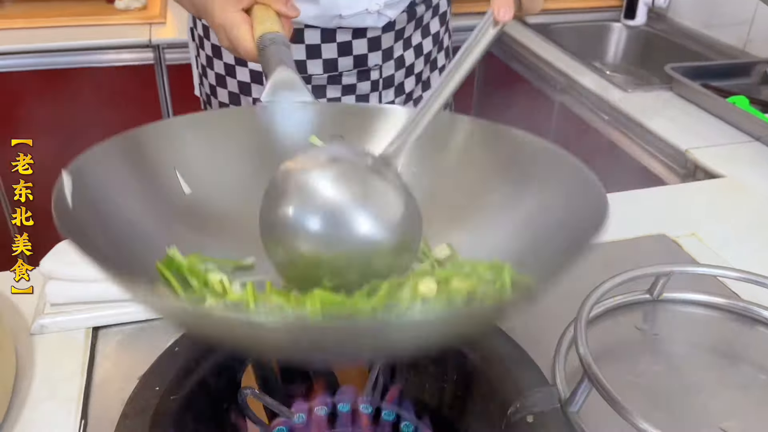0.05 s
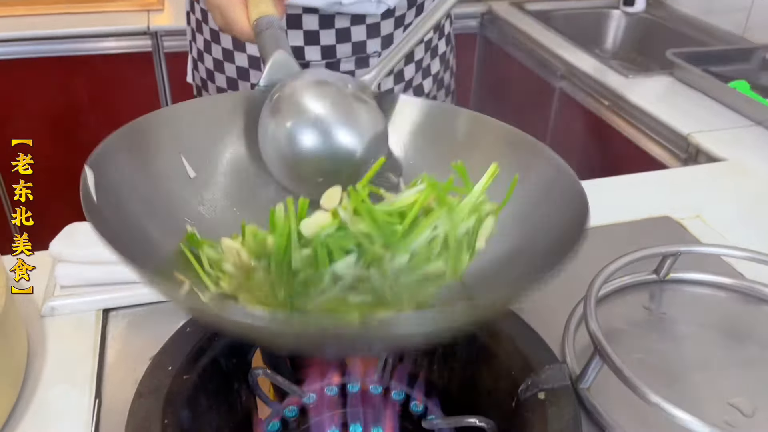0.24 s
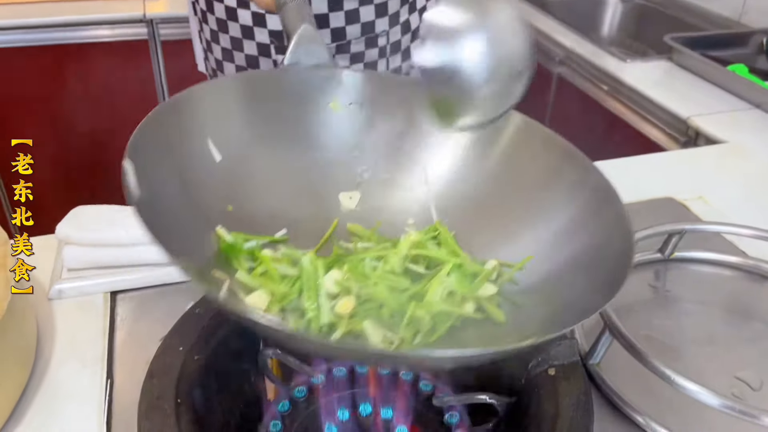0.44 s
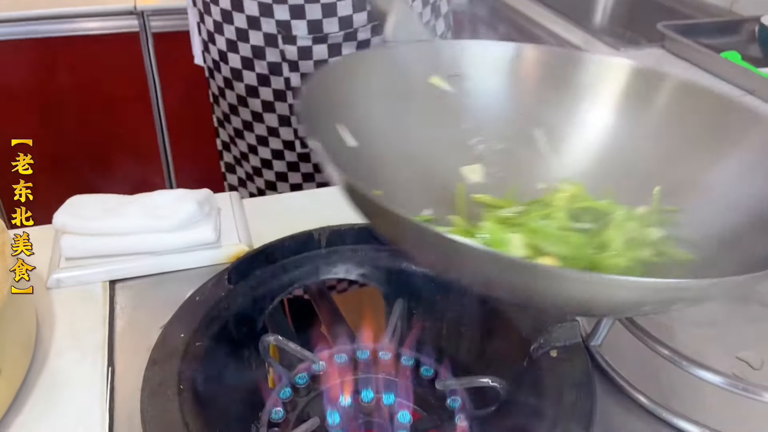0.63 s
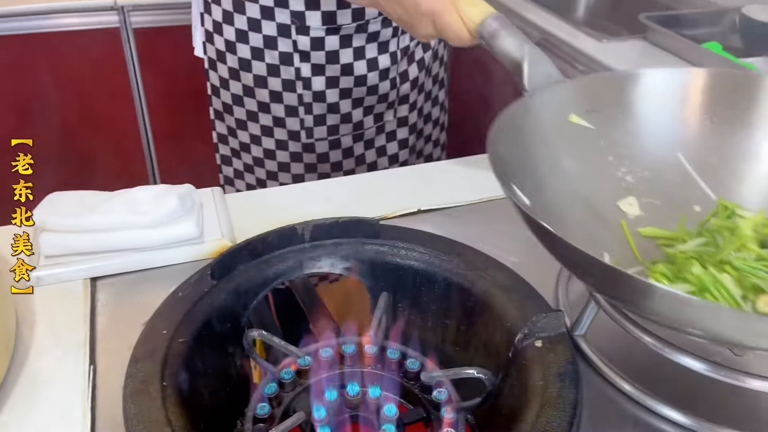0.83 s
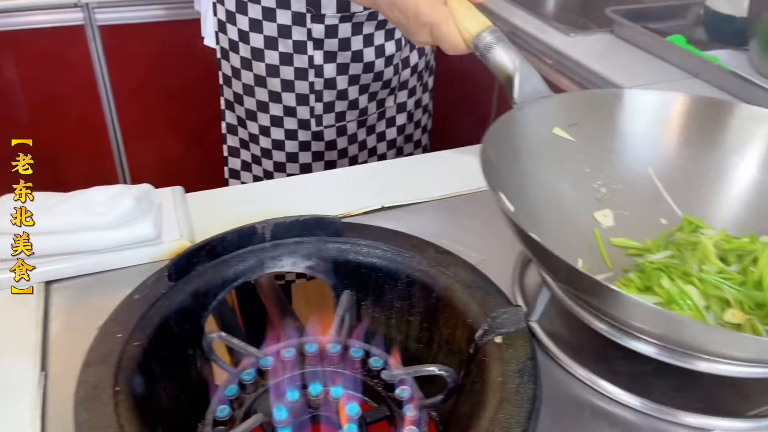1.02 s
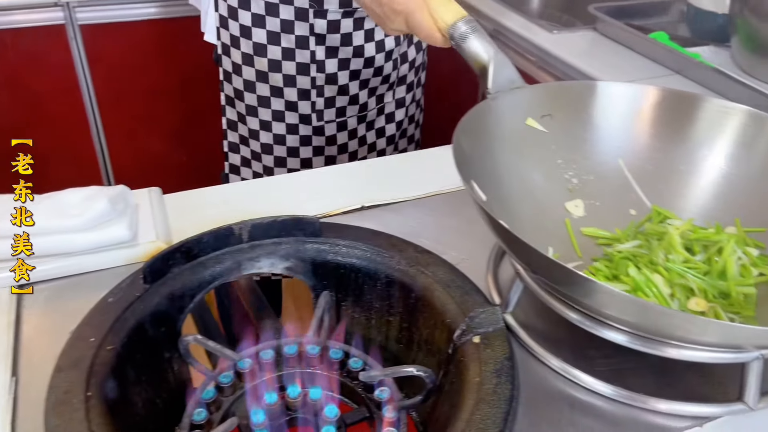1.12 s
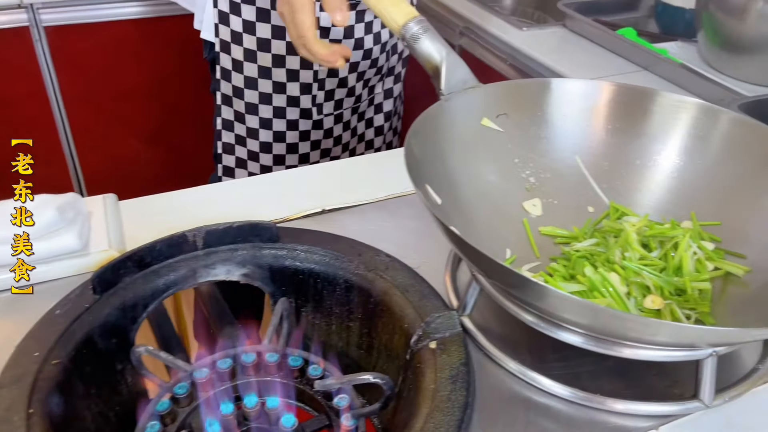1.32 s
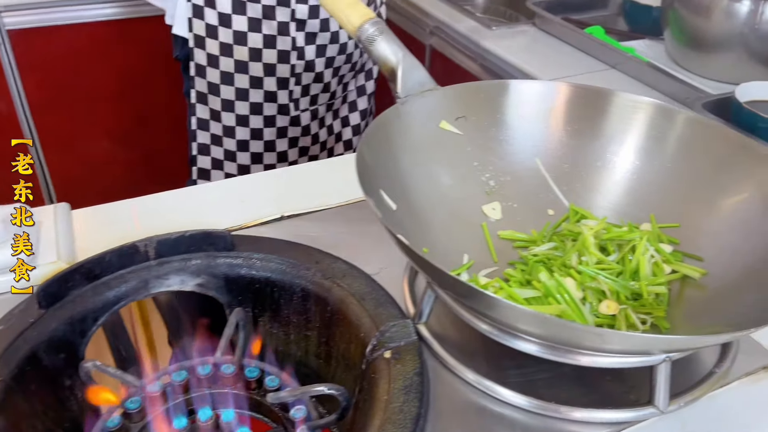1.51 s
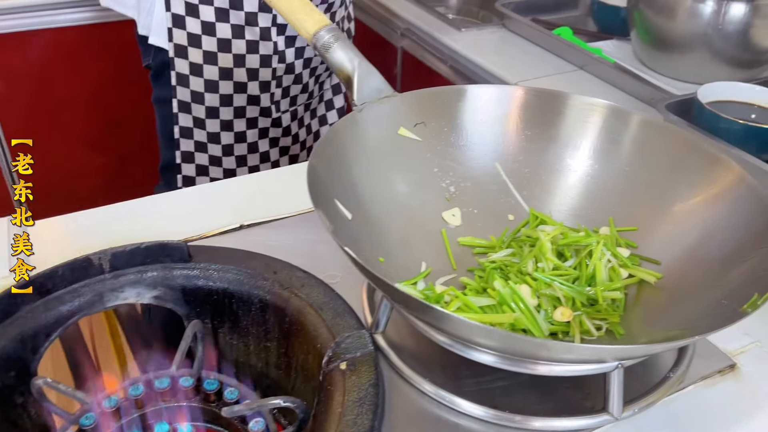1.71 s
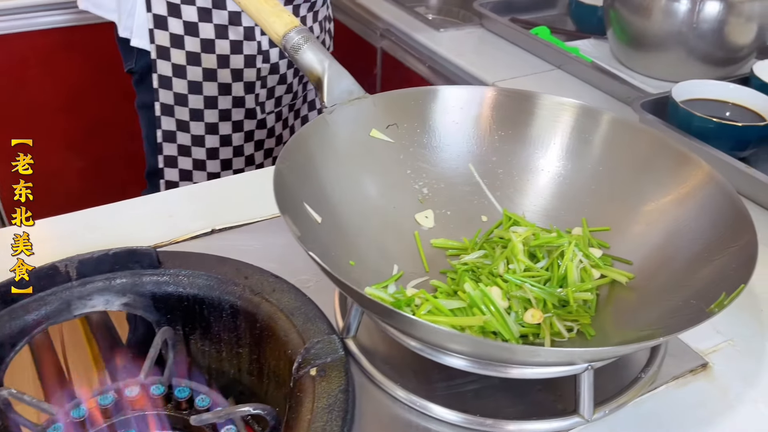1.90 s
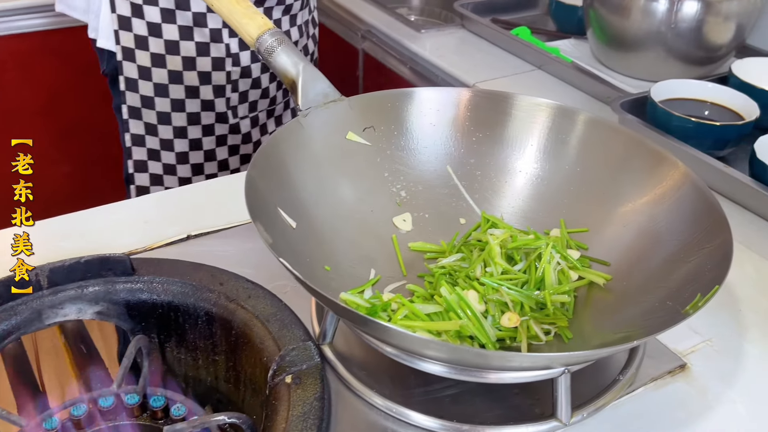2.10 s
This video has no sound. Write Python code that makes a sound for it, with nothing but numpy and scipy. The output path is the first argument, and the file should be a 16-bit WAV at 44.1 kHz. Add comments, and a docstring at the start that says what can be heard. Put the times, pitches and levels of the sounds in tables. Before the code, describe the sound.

Vegetables sizzle in a wok over a gas burner, with a ladle clank and a clatter.

```python
"""Stir-frying in a wok

Greens sizzle in a steel wok over a roaring gas burner in a hard-walled kitchen. Turbulence
makes the roar, bursting steam bubbles the sizzle. A ladle scrapes under the food and strikes
the wok, exciting its normal modes. The wok is then set down on a ring stand; its rocking
drives the resonances of the hollow steel counter, and the sizzle settles, spitting oil."""
import sys
import numpy as np
from scipy import signal
from scipy.fft import rfft, irfft
from scipy.io import wavfile
from scipy.ndimage import uniform_filter1d

SR = 44100
rng = np.random.default_rng(int(sys.argv[2]) if len(sys.argv) > 2 else 0)


def generate_wav(sig):
    """Save sig (samples, or channels by samples) to the path in sys.argv[1] as 16-bit PCM at SR."""
    pcm = np.round(np.clip(np.atleast_2d(sig).T, -1, 1) * 32767).astype(np.int16)
    wavfile.write(sys.argv[1], SR, pcm)


N = 94815
TIME = np.arange(N) / SR
BIN_HZ = np.fft.rfftfreq(N, 1 / SR)

# Likeness of left and right in the room: frequency_hz, correlation (-1 to 1)
COHERENCE = [(60, 1), (200, 0.94), (370, 0.96), (680, 0.47), (1240, 0.38), (1550, -0.2), (1850, .9),
             (2300, 0.68), (3300, 0.37), (5400, 0.26), (7400, -0.42), (9300, -0.62), (10300, 1),
             (14000, 0.76)]


def amp(db):
    """Amplitude ratio of a level in decibels."""
    return 10 ** (np.asarray(db) / 20)


def unit(x):
    """Normalisation to an rms of 1."""
    return x / np.sqrt(np.mean(x ** 2) + 1e-20)


def at_hz(points, hz):
    """Interpolation of a table on a logarithmic frequency axis."""
    frequencies, values = np.transpose(points)
    return np.interp(np.log(hz + 1), np.log(frequencies + 1), values)


def at_time(rows, t, column=1):
    """Linear interpolation of one table column over time."""
    rows = np.array(rows)
    return np.interp(t, rows[:, 0], rows[:, column])


def add(mix, start_s, sound):
    """Superposition: a sound joins the mix at its onset."""
    part = mix[:, round(start_s * SR):]
    part += sound[..., :part.shape[1]]


def colour(x, spectrum):
    """Spectral shaping: two independent signals, weighted as mid and side, take on the room's coherence."""
    correlation = np.clip(at_hz(COHERENCE, BIN_HZ), -1, 1)
    mid, side = rfft(x) * amp(at_hz(spectrum, BIN_HZ)) * np.sqrt([1 + correlation, 1 - correlation])
    return unit(irfft(np.array([mid + side, mid - side]), N))


def noise(spectrum):
    """Filtered Gaussian noise in stereo; the spectrum sets its shape, and its rms is 1."""
    return colour(rng.standard_normal((2, N)), spectrum)


def churn(x, patch_db, flicker_db, size):
    """Random amplitude modulation, in time-frequency patches and across all bands at once."""
    z = signal.stft(x, nperseg=size)[2]
    patches = uniform_filter1d(rng.standard_normal(z.shape[1:]), size=6, axis=0)
    patches = unit(uniform_filter1d(patches, size=8, axis=1))
    flicker = unit(uniform_filter1d(rng.standard_normal(z.shape[2]), size=2))
    gain = amp(patch_db * patches + flicker_db * flicker)
    return unit(signal.istft(z * gain, nperseg=size)[1][:, :N])


def burner():
    """Turbulent combustion radiates a low, fluttering roar, now duller, now more throaty."""
    # Flame noise: frequency_hz, density_db
    spectrum = [(20, -28), (32, -22), (46, -0.5), (65, -9), (92, 0.5), (150, -1), (230, -3.5), (400, -6.5),
                (660, -9), (850, -17.5), (1200, -21.5), (1520, -8.5), (1750, -65), (4000, -40.5)]
    # Course of the roar: time_s, level_db, throat_lift_db
    envelope = [(0, -42.5, 0.5), (.1, -45.5, -0.5), (.24, -42, 0.5), (.36, -52, 1), (.5, -44.5, -1.5),
                (.7, -45.5, 2), (.85, -44.5, -0.5), (1.28, -42.5, -1.5), (1.45, -43.5, 0.5),
                (1.58, -44.5, 2.5), (1.7, -44, 3), (1.9, -44, 0.5), (2.15, -43.5, -1.5)]
    throat_hz = 620
    roar = churn(noise(spectrum), patch_db=0, flicker_db=0.82, size=1024)
    hz, t, z = signal.stft(roar, SR, nperseg=512)
    throat = np.exp(-np.log2((hz + 1) / throat_hz) ** 2)[:, None]
    gain = amp(at_time(envelope, t) + throat * at_time(envelope, t, column=2))
    return signal.istft(z * gain, nperseg=512)[1][:, :N]


def frying():
    """Shot noise of bursting steam bubbles over a hiss, louder and brighter as the food is turned."""
    # Bubbles and hiss: frequency_hz, density_db
    spectrum = [(300, -40), (900, -6.5), (1500, -2.5), (1750, -4.5), (2300, -0.5), (3200, 1.5), (3900, 0.5),
                (4550, 1.5), (5200, -5), (6500, -2.5), (8000, -6.5), (10500, -11.5), (14000, -21)]
    # Course of the sizzle: time_s, level_db, treble_tilt_db_per_octave
    envelope = [(0, -35, 1.9), (.1, -37.5, 1.5), (.15, -39.5, -0.84), (.21, -40.5, 3.4), (.3, -48.5, -0.15),
                (.41, -44.5, 1.2), (.45, -39.5, 0.77), (.52, -40.5, 3.2), (.63, -40.5, -3), (.7, -40.5, -1),
                (.78, -44.5, 1.1), (.88, -41, -1.6), (1.0, -43, -0.8), (1.14, -45.5, -3.6),
                (1.3, -44, -0.66), (1.72, -45, 0.23), (1.85, -45, 0.15), (2.15, -44.5, -1.3)]
    # Louder spits of oil: start_s, level_db, tail_time_constant_s
    spits = [(0.831, -38, .005), (1.285, -32.5, 0.014), (1.476, -32.5, .014), (1.533, -38.5, .005),
             (1.797, -32, .004), (1.926, -41, .005), (2.021, -34.5, .004)]
    # Noise of one spit: frequency_hz, density_db
    spit_spectrum = [(300, -10), (1450, 6.5), (2500, 9), (4500, 0), (6500, -9), (14000, -14)]
    bubbles_per_s, spread_db, tilt_hz, spit_s = 1800, 4, 4000, 0.0007
    sizes = amp(spread_db * np.minimum(rng.exponential(1, N), 5)) * rng.choice([-1, 1], N)
    bursts = sizes * (rng.random(N) < bubbles_per_s / SR)
    angle = rng.uniform(0, 2 * np.pi, N)
    bubbles = colour(bursts * np.array([np.cos(angle), np.sin(angle)]), spectrum)
    hiss = churn(noise(spectrum), patch_db=1.2, flicker_db=1, size=256)
    hz, t, z = signal.stft(bowl_echo(amp(-4.5) * bubbles + amp(-2) * hiss), SR, nperseg=256)
    octaves = np.log2(np.maximum(hz / tilt_hz, 1))[:, None]
    gain = amp(at_time(envelope, t) + octaves * at_time(envelope, t, column=2))
    out = signal.istft(z * gain, nperseg=256)[1][:, :N]
    for start_s, level_db, tail_s in spits:
        decay = np.exp(-TIME / spit_s) + amp(-12.5) * np.exp(-TIME / tail_s)
        add(out, start_s, amp(level_db) * decay * noise(spit_spectrum))
    return out


def bowl_echo(x, decay_s=0.0039):
    """Interference with quick reflections in the bowl gives the spectrum a metallic ripple."""
    t = TIME[:SR // 20]
    response = rng.standard_normal(len(t)) * np.exp(-t / decay_s) * np.minimum(t / decay_s, 1)
    echoes = signal.fftconvolve(x, response[None] / np.linalg.norm(response), axes=1)[:, :N]
    return unit(x + amp(-6.5) * echoes)


def steam_surges(x, depth_db=1, centre_hz=3370):
    """Steam escaping in small surges modulates the amplitude of the sizzle's middle band."""
    hz, t, z = signal.stft(x, SR, nperseg=256)
    surge = unit(uniform_filter1d(uniform_filter1d(rng.standard_normal(len(t)), size=12), size=8))
    band = np.exp(-2 * np.log2((hz + 1) / centre_hz) ** 2)[:, None]
    return signal.istft(z * amp(depth_db * band * surge), nperseg=256)[1][:, :N]


def scrape():
    """Sliding friction of ladle and greens on steel makes an uneven midrange noise."""
    # Friction noise: frequency_hz, density_db
    spectrum = [(100, -22), (400, -7), (900, 7.5), (1500, 6.5), (2500, 0), (6000, -36)]
    # Strokes of the ladle: time_s, level_db
    strokes = [(0, -45), (.1, -47), (.16, -77), (.21, -42), (.26, -33.5), (.42, -67), (.47, -48), (.6, -64),
               (.75, -62)]
    return amp(at_time(strokes, TIME)) * churn(noise(spectrum), patch_db=1, flicker_db=4.5, size=256)


def ladle_clank():
    """Impact excitation: the ladle ticks, knocks and rebounds, and the wok rings in free vibration."""
    # Contact noise: frequency_hz, density_db
    tick_spectrum = [(500, 16), (2500, 3), (5000, -10), (7000, -7), (13000, -6)]
    # Heavily damped resonances of the blow: pitch_hz, level_db, peak_time_s, left_minus_right_db
    knock_modes = [(764, -8.5, 0.00113, -7.5), (1138, -5.5, 0.001393, 4), (1690, -15.5, 0.00114, 1),
                   (2170, -17.5, 0.00126, -4), (2910, -21, 0.00104, 6), (4500, -25, 0.00135, -1)]
    # What the room returns of the knock: frequency_hz, gain_db
    echo_filter = [(300, -13.5), (1250, 1.5), (1600, -8), (3300, -8), (4000, 7)]
    # Normal modes of the wok: pitch_hz, level_db, t60_s
    wok_modes = [(447, -19.5, 0.12), (548.5, -32, 0.37), (705, -45, 0.2), (973, -24, 0.25),
                 (994, -32.5, 0.45), (1156, -32, 0.13), (1185, -28.5, 0.41), (1258, -29.5, .35),
                 (1435, -30, .28), (2232, -27, 0.24), (2970, -36, 0.16), (3608, -32, .28), (4030, -34, .25),
                 (4006, -40, 0.4), (4440, -37, 0.27), (4705, -34, 0.37), (4810, -37, 0.37),
                 (5600, -40, 0.38), (6070, -43, 0.4)]
    # Dense shimmer of the bowl: frequency_hz, density_db
    shimmer_spectrum = [(25, -35), (60, -31), (200, 2), (500, 4), (1300, -13), (1800, -17), (3400, -8.5),
                        (3950, 2.5), (4800, 4), (5300, -3.5), (7000, -9), (10000, -16), (14000, -23)]
    strike_s, rebound_s, tick_s = 0.2322, 0.00417, 0.001
    ring_rise_s, shimmer_rise_s, shimmer_t60_s = 0.016, 0.013, 0.39
    knock = amp(-19) * np.exp(-TIME / tick_s) * noise(tick_spectrum)
    for hz, level_db, peak_s, pan_db in knock_modes:
        sides = amp(level_db + np.array([[pan_db], [-pan_db]]) / 2)
        pulse = (TIME / peak_s * np.exp(1 - TIME / peak_s)) ** 2.2
        knock += sides * pulse * np.cos(2 * np.pi * hz * (TIME - peak_s))
    out = np.zeros((2, N))
    add(out, strike_s, knock)
    add(out, strike_s + rebound_s, amp(-8.5) * knock)
    echoes = kitchen(irfft(rfft(out) * amp(at_hz(echo_filter, BIN_HZ)), N))
    ringing = amp(1.5) * ring(wok_modes) * np.minimum(TIME / ring_rise_s, 1)
    shimmer_gain = np.minimum(TIME / shimmer_rise_s, 1) * amp(-23 - 60 * TIME / shimmer_t60_s)
    add(out, strike_s, ringing + shimmer_gain * noise(shimmer_spectrum))
    return out + amp(-8) * echoes


def ring(modes):
    """Normal modes decay as damped sinusoids; coherence sets their left-right phase difference."""
    out = np.zeros((2, N))
    for k, (hz, level_db, t60_s) in enumerate(modes):
        skew = (-1) ** k * np.arccos(np.clip(at_hz(COHERENCE, hz), -1, 1)) / 2
        phase = 2 * np.pi * hz * TIME + np.array([[skew], [-skew]])
        out += amp(level_db - 60 * TIME / t60_s) * np.sin(phase)
    return out


def kitchen(x, wall_delay_s=0.0087):
    """Reverberation: a diffuse field begins with the nearest wall's echo and decays exponentially."""
    # Reverberation time: frequency_hz, t60_s
    decay_times = [(100, 0.23), (500, 0.38), (1200, 0.31), (4000, 0.36), (12000, 0.14)]
    hz, t, z = signal.stft(rng.standard_normal((2, SR // 2)), SR, nperseg=256)
    tail = signal.istft(z * amp(-60 * t / at_hz(decay_times, hz)[:, None]), SR, nperseg=256)[1]
    tail *= np.arange(tail.shape[1]) > wall_delay_s * SR
    return signal.fftconvolve(x, tail / np.linalg.norm(tail[0]), axes=1)[:, :N]


def wok_on_stand():
    """Structure-borne sound: each bump of the rocking wok thuds, clatters and makes the counter boom."""
    # Impacts on the stand: start_s, thump_db, clatter_db, hardness_db_per_octave
    bumps = [(.921, 1, -0.5, -0.5), (.934, -42, -6.5, -5), (.974, -2.5, -4.5, -1.5), (0.9941, -1.5, 0.5, 1),
             (1.068, -5.5, -13.5, -6.5)]
    # Normal modes of counter and stand: pitch_hz, level_db, t60_s
    counter_modes = [(86.4, -28, 0.25), (91, -23, 0.36), (106.4, -30, 0.34), (169, -38, .22),
                     (204.1, -27, 0.29), (238.6, -40, 0.21), (277, -26.5, 0.37), (348.4, -23.5, 0.32),
                     (374, -47, .22), (558.6, -40.5, 0.53), (1158, -45, 0.37), (1350, -46, 0.13)]
    # Steel clattering on steel: frequency_hz, density_db
    spectrum = [(25, -40), (45, 3), (90, 7.5), (250, 11.5), (500, 2), (800, 0.5), (1000, -3.5), (1450, 0.5),
                (2000, -8), (3300, -9.5), (4600, -7.5), (6000, -26), (12000, -40)]
    thud_hz, thud_peak_s, boom_rise_s, pivot_hz = 170, 0.0051, 0.009, 101
    clatter_rise_s, clatter_decay_s, rattle_t60_s = 0.0013, 0.0074, 0.41
    pulse = (TIME / thud_peak_s * np.exp(1 - TIME / thud_peak_s)) ** 2
    thud = amp(-30) * pulse * np.sin(2 * np.pi * thud_hz * TIME)
    decay = amp(-23.5) * np.exp(-TIME / clatter_decay_s) + amp(-28 - 60 * TIME / rattle_t60_s)
    out = np.zeros((2, N))
    for start_s, thump_db, clatter_db, hardness in bumps:
        modes = [(hz, db + hardness * np.log2(hz / pivot_hz), t60) for hz, db, t60 in counter_modes]
        boom = ring(modes) * np.minimum(TIME / boom_rise_s, 1)
        clatter = decay * np.minimum(TIME / clatter_rise_s, 1) * noise(spectrum)
        add(out, start_s, amp(thump_db) * (thud + boom) + amp(clatter_db) * clatter)
    return out + amp(-17.5) * kitchen(out)


def scene():
    """Superposition of the sound pressures of flame, food and steel."""
    return burner() + steam_surges(frying()) + scrape() + ladle_clank() + wok_on_stand()


def record(dry):
    """Filtering and saturation: rumble is cut, peaks round off, the treble is notched and band-limited."""
    low_cut_hz, notch_hz, high_cut_hz, ceiling = 44, (7620, 8950), 14200, 0.9
    dry = signal.sosfilt(signal.butter(4, low_cut_hz, "high", fs=SR, output="sos"), dry)
    left, right = dry / (1 + (dry / ceiling) ** 6) ** (1 / 6)
    mid, side = (left + right) / 2, (left - right) / 2
    notch = signal.firwin(511, notch_hz, window=("kaiser", 5), fs=SR)
    mid = signal.oaconvolve(mid, notch, "same")
    low_pass = signal.firwin(511, high_cut_hz, window=("kaiser", 9), fs=SR)
    return signal.oaconvolve(np.array([mid + side, mid - side]), low_pass[None], "same")


dry = scene()
out = record(dry)
generate_wav(out)
```